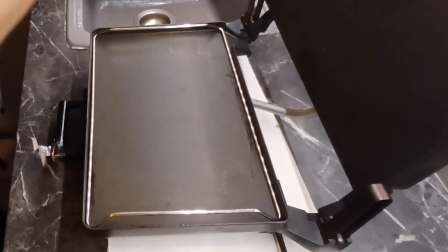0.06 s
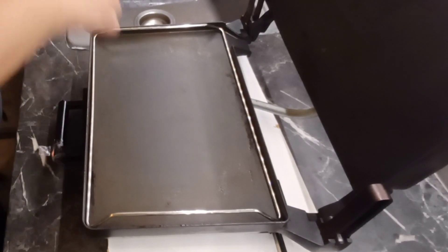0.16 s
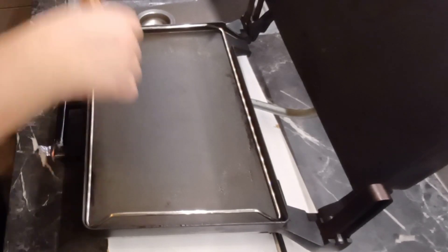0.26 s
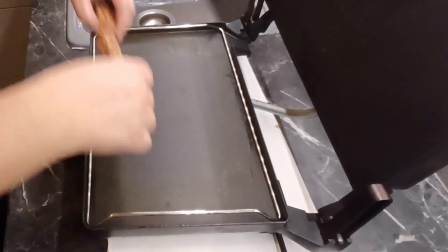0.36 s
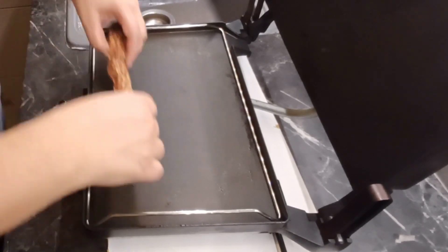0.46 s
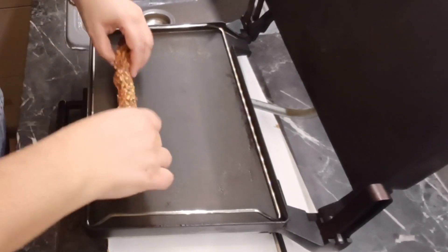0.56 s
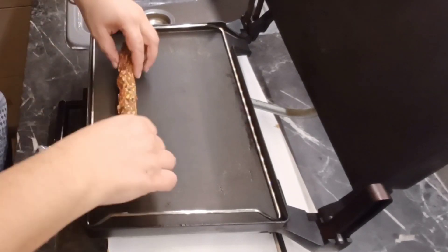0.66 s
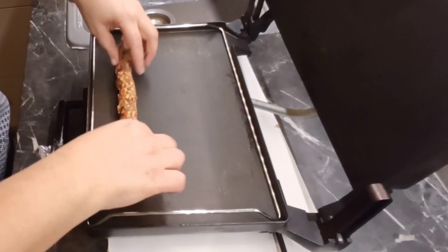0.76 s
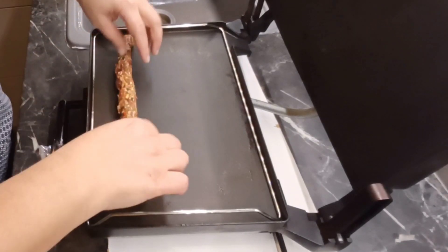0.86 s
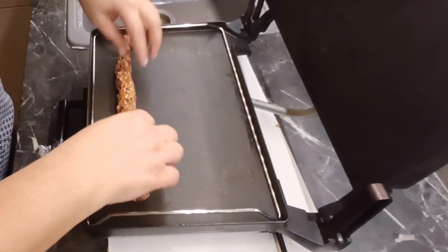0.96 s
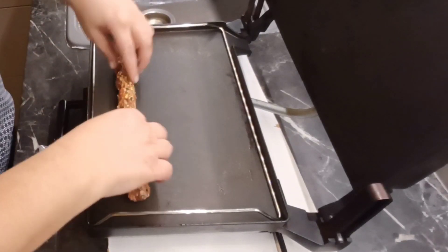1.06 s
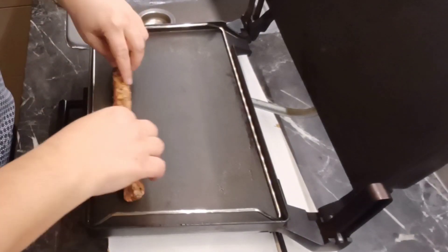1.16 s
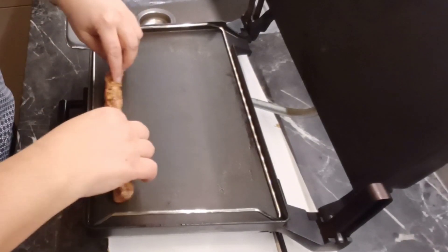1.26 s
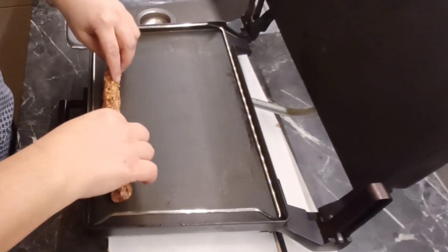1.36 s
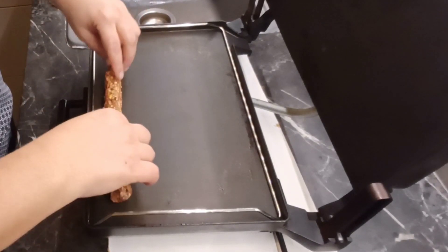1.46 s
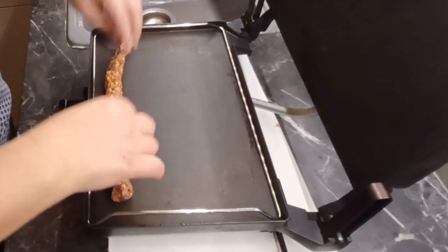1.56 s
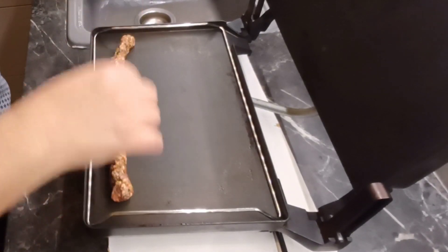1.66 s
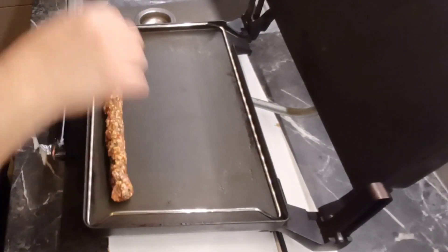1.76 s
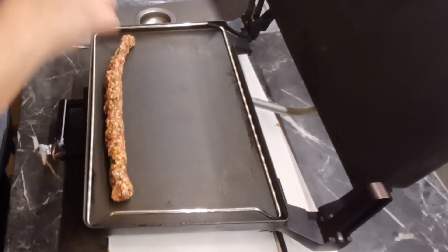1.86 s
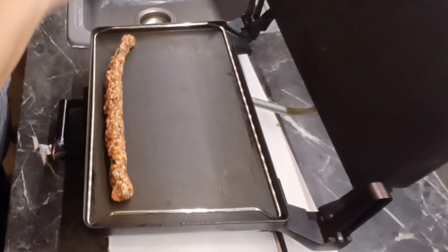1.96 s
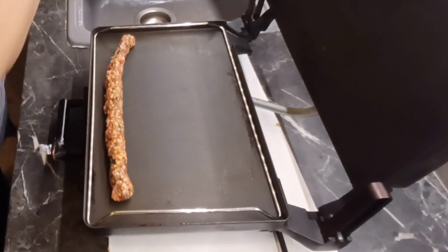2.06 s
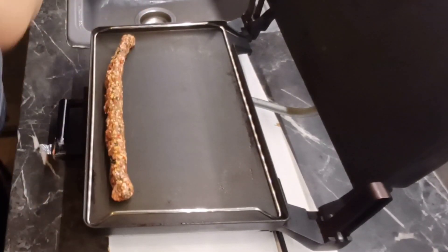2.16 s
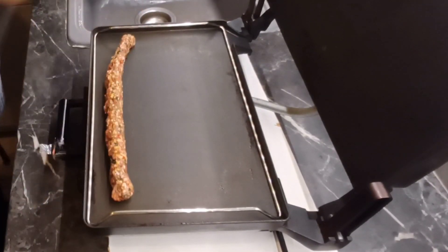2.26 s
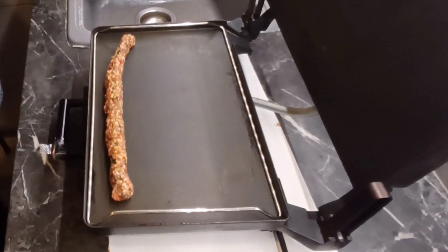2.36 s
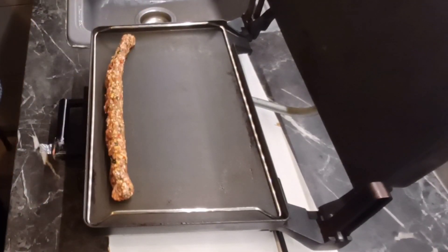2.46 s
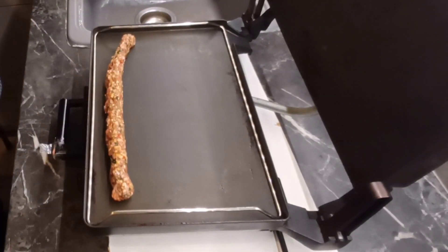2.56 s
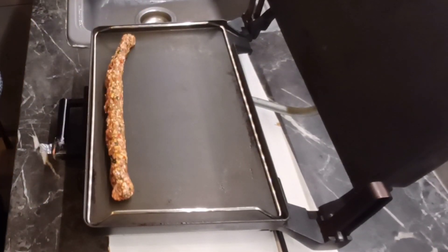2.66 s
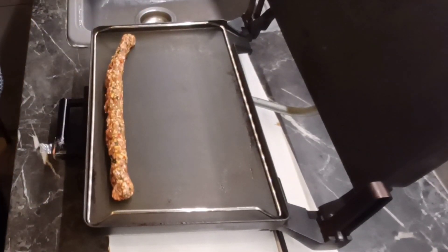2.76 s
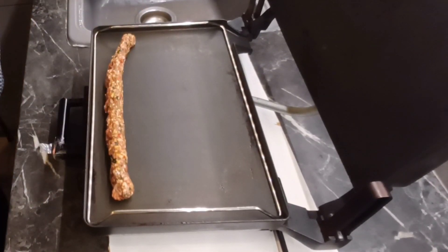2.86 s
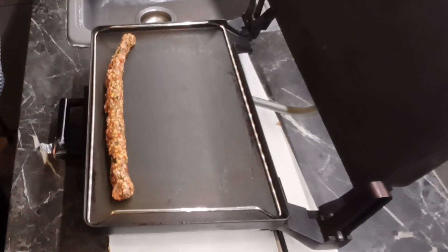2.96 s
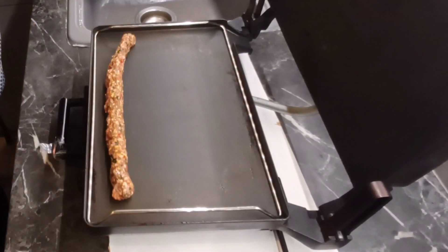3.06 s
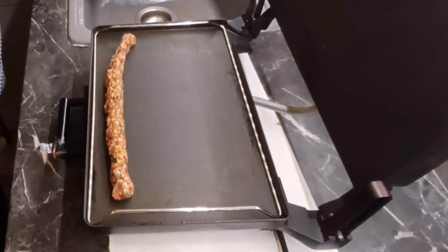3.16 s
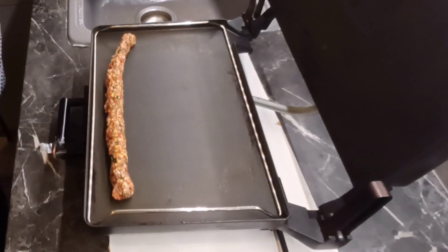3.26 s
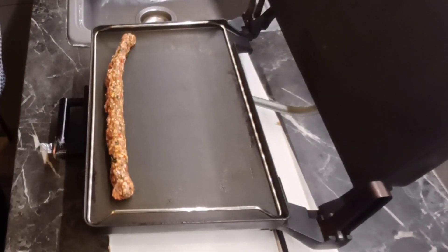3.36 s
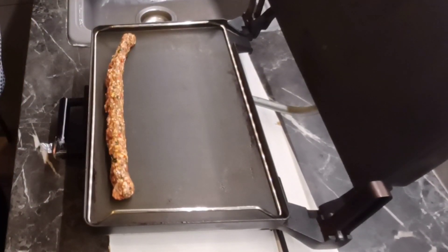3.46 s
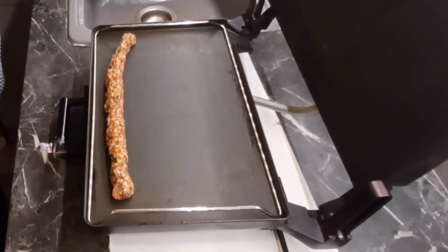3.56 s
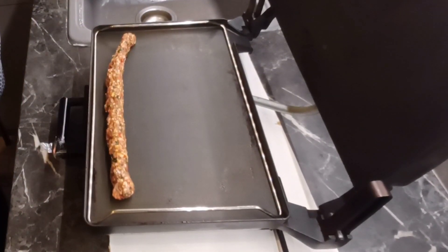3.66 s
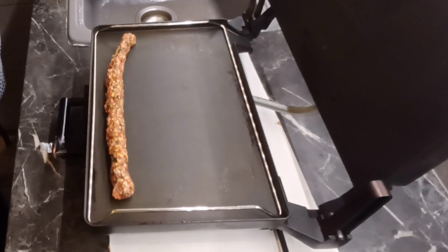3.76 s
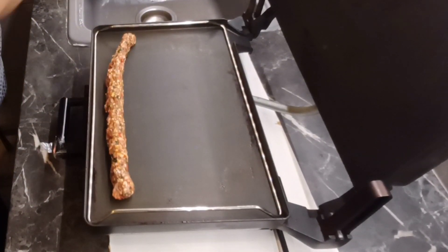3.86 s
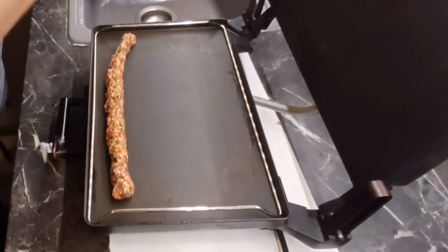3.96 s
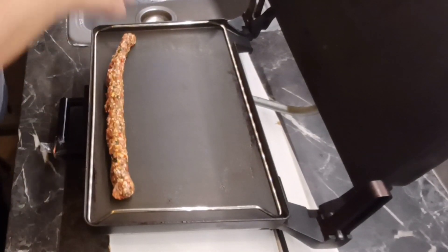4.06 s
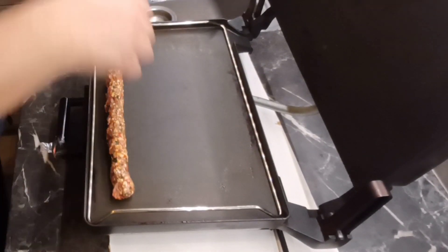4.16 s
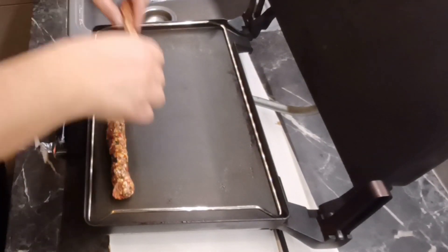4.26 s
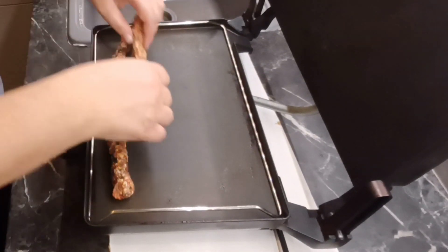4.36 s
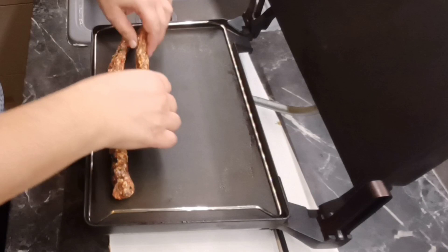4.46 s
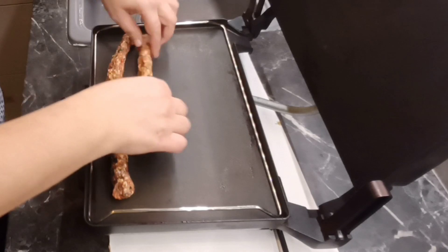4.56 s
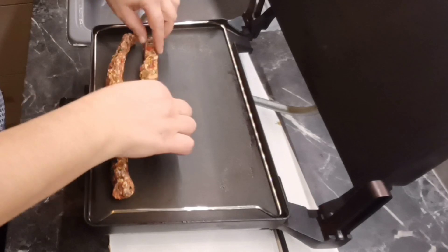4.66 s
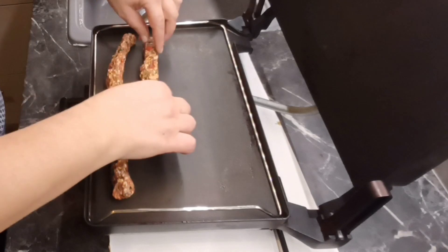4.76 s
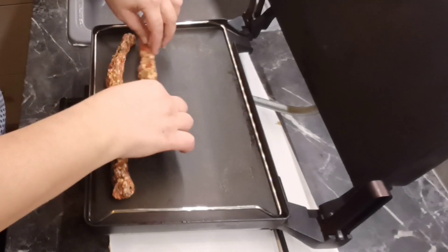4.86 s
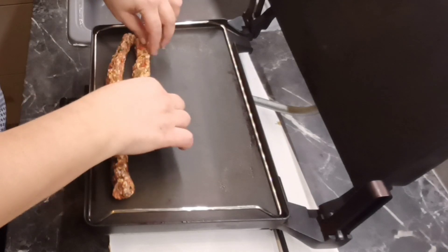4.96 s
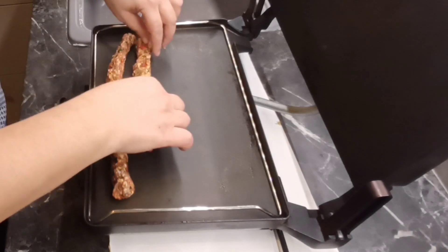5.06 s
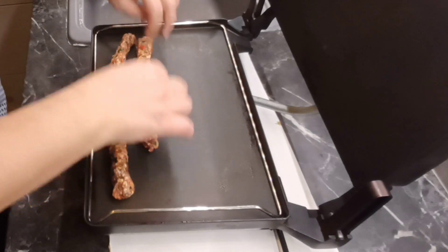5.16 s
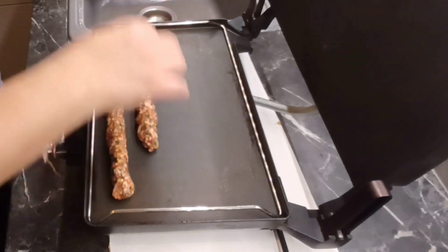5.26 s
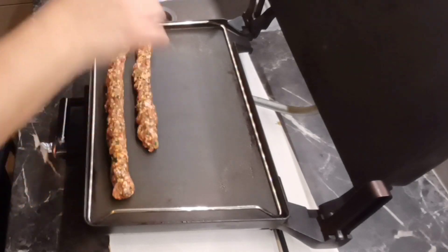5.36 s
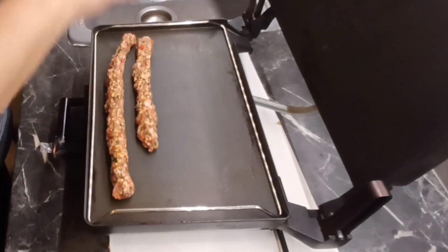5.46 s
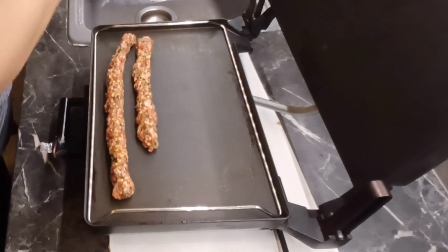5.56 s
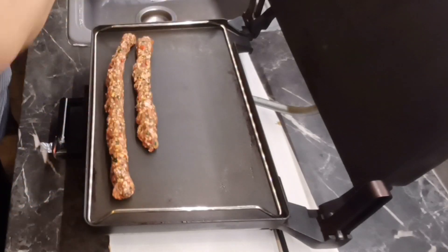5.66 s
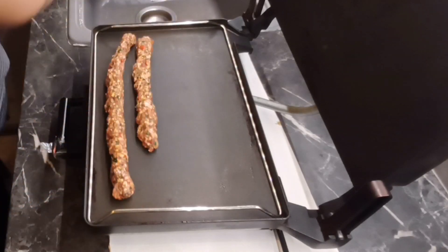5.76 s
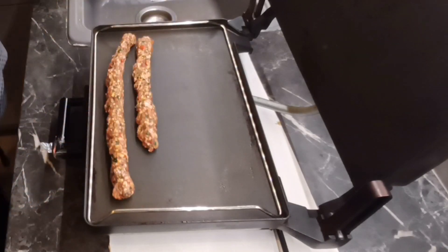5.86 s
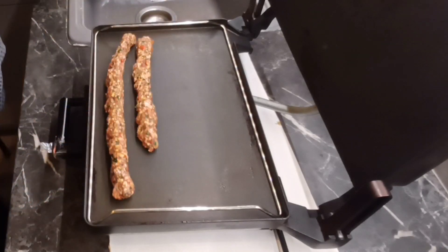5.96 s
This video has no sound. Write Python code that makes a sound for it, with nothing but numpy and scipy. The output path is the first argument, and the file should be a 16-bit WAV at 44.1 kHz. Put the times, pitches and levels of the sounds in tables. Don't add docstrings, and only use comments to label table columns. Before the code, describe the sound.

Raw minced meat is laid on a hot grill plate in a quiet kitchen; bright crackling sizzle swells and holds with sharp spits and pops.

```python
import sys
import numpy as np
from scipy import signal
from scipy.fft import rfft, irfft
from scipy.io import wavfile
from scipy.ndimage import uniform_filter1d

SR = 44100
rng = np.random.default_rng(int(sys.argv[2]) if len(sys.argv) > 2 else 0)


def natural_amplitude(level_db):
    exponent = np.asarray(level_db, float) / 20
    return 10 ** exponent


def generate_wav(sig):
    pcm = np.round(np.clip(np.atleast_2d(sig).T, -1, 1) * 32767).astype(np.int16)
    wavfile.write(sys.argv[1], SR, pcm)


N = 265482

# frequency in Hz, level in dB per Hz.
ROOM_COLOUR = [(12, -51), (20, -32), (27, -30), (42, -10), (64, -4), (81, -4), (171, -9), (307, -13),
               (651, -19), (708, -23), (860, -26.5), (5120, -38), (6400, -44.5), (11500, -38), (15600, -41)]
# frequency in Hz, left-right likeness from -1 to 1.
ROOM_LIKENESS = [(60, 0.5), (240, 0.074), (950, -0.011), (3770, 0.066), (15000, -0.03)]
# peak time in seconds, length in seconds, level in dB, pitch in Hz.
THUDS = [(0.787, .09, -62, 104), (0.849, 0.072, -47, 78.5), (0.887, 0.0615, -50.5, 104.8),
         (.928, 0.042, -62, 105), (.97, .12, -67, 115), (1.142, .06, -70, 86), (2.081, .07, -71, 110),
         (2.5, 0.13, -68.5, 119.3), (2.74, .07, -70, 90), (4.019, .08, -72, 98.5), (4.317, .08, -71, 111),
         (4.629, 0.057, -60, 76), (4.712, 0.04, -60, 131), (4.737, .06, -61, 79), (4.771, 0.037, -63, 98),
         (4.845, .06, -68, 85), (5.95, .06, -73, 100)]
# multiple of the pitch, level in dB.
THUD_OVERTONES = [(2, -14.5), (3, -20.5)]
# peak time in seconds, length in seconds, level in dB, pitch in Hz.
PLATE_HUMS = [
    (0.776, .12, -72, 319),
    (0.873, 0.12, -67.5, 315),
    (.96, .16, -67.5, 309),
    (0.986, .16, -67, 765),
    (1.1, 0.16, -70, 765),
    (1.749, 0.16, -63, 770),
]
# peak time in seconds, length in seconds, level in dB, pitch in Hz.
FIRST_STEAM = [
    (0.707, .11, -72, 2090),
    (0.718, 0.14, -77, 1750),
    (1.31, 0.096, -72, 440),
    (1.477, 0.22, -72, 310),
    (1.45, .2, -76, 145),
    (1.75, .2, -75, 145),
]
# start in seconds, peak in dB, left minus right in dB, pitch in Hz.
TICKS = [
    (0.1494, -74, -1.0, 4760),
    (0.2794, -70, -2.5, 11600),
    (0.3594, -75, -1.5, 11400),
    (.475, -76, -2, 12500),
    (0.5357, -66, -4.5, 11000),
]
# start in seconds, peak in dB, left minus right in dB, pitch in Hz.
JUICE_POPS = [
    (1.704, -45, 0, 1440),
    (2.567, -37, 0.0, 1640),
    (2.675, -43, -2.0, 1410),
    (3.601, -49, -1.0, 1460),
    (4.155, -35, -1.0, 1660),
    (4.394, -51, -7, 1350),
    (4.949, -39, -2.0, 1730),
    (5.654, -41, 1, 1300),
]
# start in seconds, peak in dB, left minus right in dB, pitch in Hz.
KNOCKS = [
    (5.2788, -23.5, -2, 1850),
    (5.793, -23.5, -1, 2000),
]
# start in seconds, peak in dB, left minus right in dB, pitch in Hz.
BIG_SPITS = [
    (1.7241, -11, 3.0, 12600),
    (1.9684, -13, -3.0, 11700),
    (2.9651, -15, -2.0, 11700),
    (3.676, -14, -1.5, 14900),
    (3.8745, -15, -2, 13000),
    (4.0826, -16, -1.5, 14500),
    (5.5154, -14, -2.0, 15200),
]
# start in seconds, peak in dB, left minus right in dB.
LOUD_SPITS = [(.978, -19, -1), (1.1322, -26, -2.5), (1.2918, -19, -3), (1.4979, -15, -3), (1.5557, -24, -2),
              (1.6086, -22, -2.5), (1.7039, -17, -5), (1.8233, -15, 0), (1.9493, -10, -2.5),
              (1.9686, -9, -6), (2.006, -15, -1.5), (2.0775, -17, -1.5), (2.1813, -17, -1),
              (2.4432, -19, -1.5), (2.4983, -15, -6), (2.5696, -14, -2), (2.8097, -14, 0),
              (2.8917, -13, -4), (2.9653, -10.5, -3), (3.293, -15, -3), (3.7842, -25, -4),
              (1.3033, -19, -2), (4.083, -12, -3), (4.5482, -20, -1.5), (4.875, -16, -5),
              (4.8967, -12.5, -5), (5.3765, -14, 1.5), (5.5173, -14, -9), (5.6404, -20, -5),
              (5.9098, -18.5, -8)]
# time in seconds, strength in dB, dulling by hands and pressed juice in dB.
BOIL = [(.572, -88, 0), (.592, -59, -2), (.64, -53, -2), (.7, -47.5, 1), (.94, -38, 1), (1.11, -36, 3.5),
        (1.15, -32, 0), (1.29, -34.5, -3), (1.38, -35, 1), (1.59, -30, 0.5), (1.95, -29.5, 0),
        (2.1, -30.5, 0), (4.1, -30.5, -0.5), (4.6, -33, 2), (4.92, -30, 0), (5.15, -30, 2.5),
        (5.3, -28.5, 0), (6.02, -29.5, 1.5)]
# frequency in Hz, level in dB per Hz.
FRY_COLOUR = [(180, -38), (300, -33.5), (544, -34.5), (757, -22.5), (1130, -22), (1330, -14), (1700, -13.5),
              (2450, -11.5), (3580, -9), (4990, -6.5), (6180, -6), (7170, -7), (9820, -1.5), (13200, 0.5),
              (15600, -1)]
# frequency in Hz, left minus right in dB.
FRY_LEAN = [(60, 0.0), (99, 0.0), (160, -1), (270, 1), (450, 1), (740, -5.5), (1220, -2), (2010, -0.5),
            (3330, -4.5), (5500, -3), (9080, -5), (15000, -1.5)]
# frequency in Hz, share from 0 to 1.
STRAIGHT_SHARE = [(500, 0.73), (1500, 0.64), (2400, 0.67), (3200, 0.2), (6000, 0.44), (9000, 0.26),
                  (15000, 0.17)]
# frequency in Hz, width in Hz, level in dB.
HOLLOWS = [(704, 240, 5), (3760, 600, 3), (7310, 450, 5), (9900, 950, -4), (1010, 110, -0.5),
           (2330, 150, -3.5)]
# frequency in Hz, width in Hz, level in dB.
PLATE_NOTCH = (6120, 380, -4.5)

ROOM_DB = -75.5
RUMBLE_WAKES_S, RUMBLE_WAKES_DB, RUMBLE_SWELL_DB = 0.74, 5, 1
THUD_RISE, THUD_FOOT_DB = 0.51, -15
HUM_RISE, HUM_FOOT_DB = 0.6, -9
SPIT_HZ, SPIT_SPREAD_HZ = 13400, 1500
SMALL_SPITS, SMALL_SPIT_DB, SMALL_LEAN_DB = 30, 5, -2.5
BURSTS_PER_S, SIZE_SPREAD_DB, SPOTS = 7500, 3, 12
LAG, BOUNCE_LAG, BOUNCE_DB = 2.6, 26.5, -5
HISS_FOLLOWS = 0.43
YOUNG_BODY_DB, YOUNG_HISS_DB, BODY_GROW_S, HISS_GROW_S = -18, -14, 0.13, 0.056


def evened(x):
    return x / np.sqrt(np.mean(x ** 2) + 1e-20)


def read(points, hz):
    f, value = np.transpose(points)
    return np.interp(np.log(hz + 1), np.log(f + 1), value)


def dip(hz, centre, width, db):
    return db / (1 + (2 * (hz - centre) / width) ** 2)


def add(mix, s, sound):
    part = mix[:, round(s * SR):][:, :sound.shape[1]]
    part += sound[:, :part.shape[1]]


def drift(shape, frames, bins):
    z = rng.standard_normal(shape[::-1]).T
    z = uniform_filter1d(z, round(bins), 0)
    return evened(uniform_filter1d(z, round(frames), 1))


def scatter(shape, t60):
    t = np.arange(1024) / SR
    z = rfft(rng.standard_normal((*shape, 1024)) * natural_amplitude(-60 * t / t60))
    z /= np.sqrt(uniform_filter1d(abs(z) ** 2, size=15, axis=-1))
    tail = irfft(z)
    return tail / np.linalg.norm(tail, axis=-1, keepdims=True)


def room():
    frames, hz = N // 256 + 5, np.fft.rfftfreq(1024, 1 / SR)
    a, b, c, d = rng.standard_normal((frames, 513, 4)).T
    same = np.clip(read(ROOM_LIKENESS, hz), -1, 1)[:, None]
    left, other = a + 1j * b, c + 1j * d
    z = np.array([left, same * left + np.sqrt(1 - same ** 2) * other])
    t = (np.arange(frames) - 2) * 256 / SR
    in_low = read([(500, 1), (900, 0)], hz)[:, None]
    awake = RUMBLE_WAKES_DB * np.clip((t - RUMBLE_WAKES_S) / 0.2, -1, 0)
    swell = in_low * (awake + RUMBLE_SWELL_DB * drift(a.shape, frames=40, bins=8))
    z *= natural_amplitude(swell + 1.4 * in_low * drift(a.shape, frames=6, bins=4))
    noise = signal.istft(z, nperseg=1024, noverlap=768)[1][:, :N]
    fine_hz = np.fft.rfftfreq(N, 1 / SR)
    coloured = irfft(rfft(noise) * natural_amplitude(read(ROOM_COLOUR, fine_hz)), N)
    return natural_amplitude(ROOM_DB + 4.5) * evened(coloured)


def arch(peak_s, length, db, hz, rise, foot_db):
    start = peak_s - np.clip(rise, 0.1, 0.9) * length
    return [(start, db + foot_db, hz), (peak_s, db, hz), (start + length, db + foot_db, hz)]


def tone(rows, wobble, overtones=()):
    s, db, hz = np.transpose(rows)
    t = np.arange(s[0], s[-1], 1 / SR)
    waver = evened(uniform_filter1d(rng.standard_normal((2, SR // 2)), 900))
    pitch_waver, level_waver_db = waver[:, :len(t)]
    turns = np.cumsum(np.interp(t, s, hz) * (1 + wobble * pitch_waver)) / SR
    wave = sum(natural_amplitude(d) * np.sin(2 * np.pi * k * turns) for k, d in [(1, 0), *overtones])
    wave = wave * np.sqrt(2) * natural_amplitude(np.interp(t, s, db) + level_waver_db)
    return s[0], natural_amplitude([[-1.5], [1.5]]) * wave * signal.windows.tukey(len(t), 0.35)


def thuds():
    out = np.zeros((2, N))
    for row in THUDS:
        add(out, *tone(arch(*row, THUD_RISE, THUD_FOOT_DB), wobble=0.013, overtones=THUD_OVERTONES))
    return out


def hums(events, wobble):
    out = np.zeros((2, N))
    for row in events:
        add(out, *tone(arch(*row, HUM_RISE, HUM_FOOT_DB), wobble))
    return out


def snaps(events, cycles, t60, wet_db, low_hz):
    out, t = np.zeros((2, N)), np.arange(256) / SR
    tails = scatter((len(events), 2), t60)
    no_bass = signal.butter(2, low_hz, "high", fs=SR)
    for (s, db, lean_db, hz), tail in zip(events, tails):
        u = t * hz / cycles
        ring = u * np.exp(1 - u) * np.sin(2 * np.pi * hz * t)
        paths = natural_amplitude(wet_db) * tail
        paths[:, :4] += [[1, 0, 0, 0], [0, 0, 0, 1]]
        heard = signal.lfilter(*no_bass, signal.fftconvolve(ring[None], paths, axes=1))
        heard /= abs(heard).max(1, keepdims=True)
        sides_db = np.array([[lean_db], [-lean_db]]) / 2
        add(out, s, natural_amplitude(db + sides_db) * heard)
    return out


def spits():
    when, size, lean = rng.random((SMALL_SPITS, 3)).T
    s = 0.85 + 5.1 * when
    boil_db = np.interp(s, *np.transpose(BOIL)[:2])
    db = boil_db + SMALL_SPIT_DB + 5 * (size - 0.5)
    small = np.transpose([s, db, SMALL_LEAN_DB + 5 * (lean - 0.5)])
    rows = np.concatenate([LOUD_SPITS, small])
    return np.column_stack([rows, SPIT_HZ + SPIT_SPREAD_HZ * rng.uniform(-1.1, 1, len(rows))])


def bursts():
    flurries = natural_amplitude(0.14 * evened(uniform_filter1d(rng.standard_normal(N), 120)))
    size = natural_amplitude(SIZE_SPREAD_DB * np.minimum(rng.exponential(1, N), 3.5)) * rng.choice([-1., 1.], N)
    size *= flurries * (rng.random(N) < BURSTS_PER_S / SR)
    spot = rng.integers(0, SPOTS, N)
    trains = size * (spot == np.arange(SPOTS)[:, None])
    near_metal, kitchen = scatter((2, SPOTS), 0.0056), scatter((2, SPOTS), 0.082)
    paths = near_metal + natural_amplitude(-1) * kitchen
    paths /= np.linalg.norm(paths, axis=-1, keepdims=True)
    scattered = signal.oaconvolve(trains[None], paths, axes=2)[..., :N].sum(1)
    hz = np.fft.rfftfreq(N, 1 / SR)
    late = np.exp(-2j * np.pi * hz / SR)
    right = late ** LAG + natural_amplitude(BOUNCE_DB) * late ** BOUNCE_LAG
    right /= np.sqrt(1 + natural_amplitude(2 * BOUNCE_DB))
    share = np.clip(read(STRAIGHT_SHARE, hz), 0, 1)
    straight = rfft(size) * [np.ones_like(right), right]
    z = share * straight + np.sqrt(1 - share ** 2) * rfft(scattered)
    return evened(irfft(z, N))


def sizzle():
    hz, t, z = signal.stft(bursts(), SR, nperseg=512, noverlap=384)
    s, boil_db, dull_db = np.transpose(BOIL)
    fizz, dull = np.interp(t, s, boil_db), np.interp(t, s, dull_db)
    age = np.maximum(t - s[0], 0)
    body = dull + YOUNG_BODY_DB * np.exp(-age / BODY_GROW_S)
    hiss = HISS_FOLLOWS * dull + YOUNG_HISS_DB * np.exp(-age / HISS_GROW_S)
    in_body = read([(3000, 1), (4200, 0)], hz)[:, None]
    in_fizz = read([(6500, 0), (9500, 1)], hz)[:, None]
    colour = read(FRY_COLOUR, hz) + dip(hz, *PLATE_NOTCH)
    colour -= 10 * np.log10(np.sum(natural_amplitude(2 * colour)[hz > 8000]) / len(hz))
    db = colour[:, None] + fizz + in_body * body + (1 - in_body - in_fizz) * hiss
    restless_db = 0.93 * read([(1200, 1.14), (6000, 0.76), (12000, 0.37)], hz)[:, None]
    db += restless_db * drift(db.shape, frames=12, bins=6)
    db -= 100 * (t < s[0])
    lean = read(FRY_LEAN, hz)[:, None] / 2
    hollows = sum(dip(hz, *row) for row in HOLLOWS)[:, None]
    z = z * natural_amplitude([db + lean + 5.0, db - lean + hollows + 4.5])
    return signal.istft(z, SR, nperseg=512, noverlap=384)[1][:, :N]


def scene():
    out = sizzle() + room()
    out += snaps(spits(), cycles=0.32, t60=0.029, wet_db=10.5, low_hz=1500)
    out += natural_amplitude(2.5) * snaps(BIG_SPITS, cycles=0.5, t60=0.012, wet_db=1, low_hz=2000)
    out += natural_amplitude(-1) * snaps(KNOCKS, cycles=0.3, t60=0.01, wet_db=-5, low_hz=650)
    out += snaps(JUICE_POPS, cycles=0.32, t60=0.008, wet_db=-6, low_hz=550)
    out += snaps(TICKS, cycles=0.89, t60=0.054, wet_db=9, low_hz=2500)
    out += thuds()
    out += hums(PLATE_HUMS, wobble=0.007)
    out += hums(FIRST_STEAM, wobble=0.042)
    return out


def band_limit(x):
    return signal.sosfilt(signal.butter(12, 17090, fs=SR, output="sos"), x)


def record(dry):
    edge = signal.firwin(1023, 15740, window=("kaiser", 9), fs=SR)
    return band_limit(signal.oaconvolve(dry, edge[None], "same"))


dry = scene()
out = record(dry)
generate_wav(out)
```